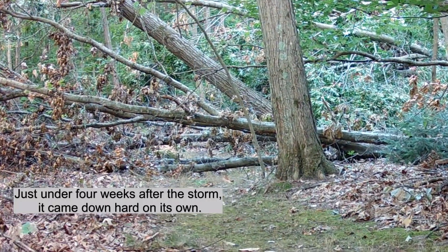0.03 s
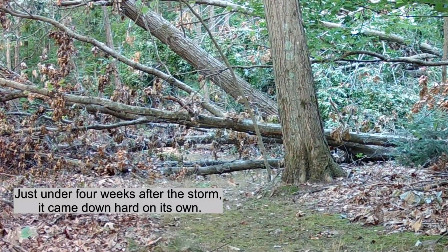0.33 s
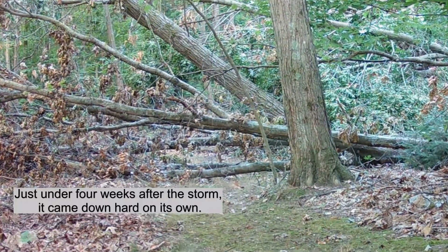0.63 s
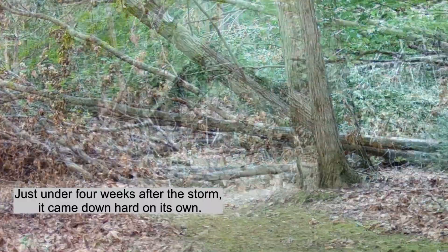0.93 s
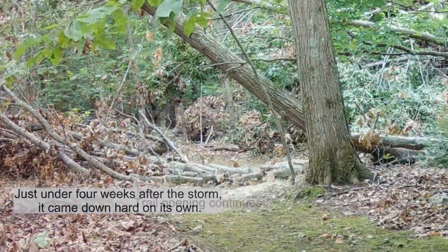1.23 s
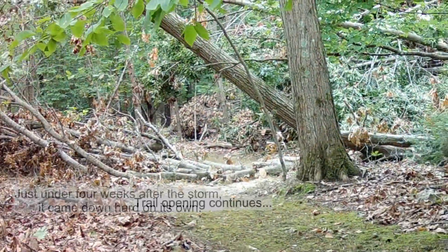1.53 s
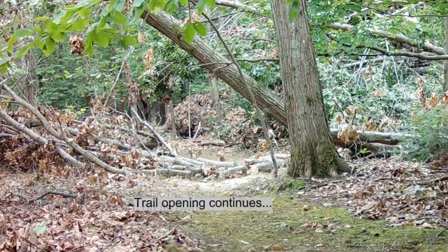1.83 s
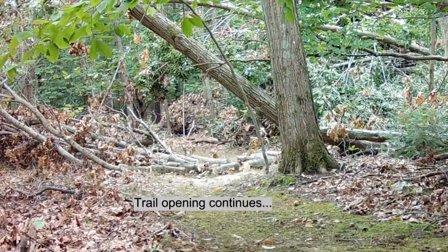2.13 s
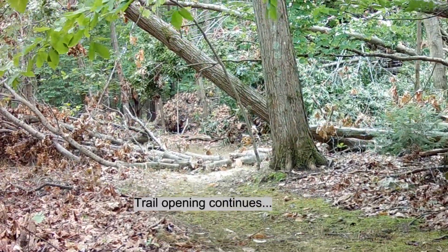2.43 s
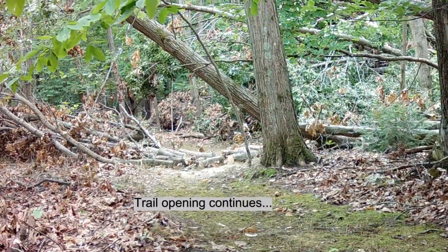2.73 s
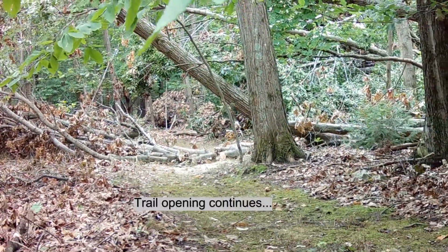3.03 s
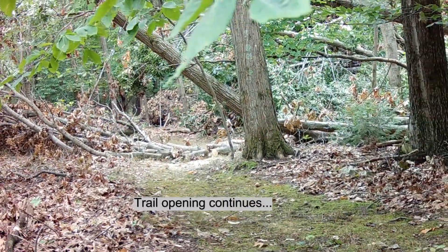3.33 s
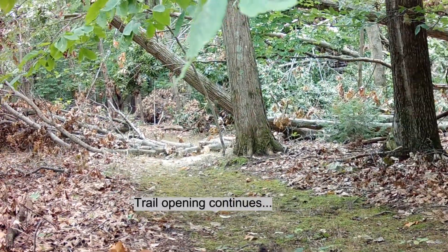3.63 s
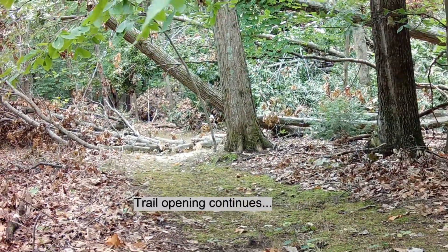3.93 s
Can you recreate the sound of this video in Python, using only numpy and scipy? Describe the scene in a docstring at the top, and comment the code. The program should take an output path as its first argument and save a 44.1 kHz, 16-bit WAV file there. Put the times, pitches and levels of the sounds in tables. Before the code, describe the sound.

Wind in the treetops takes over from a quiet woodland opening, where thin notes, perhaps a distant bird, die away. The leaves keep up an even rustle, with a few close, crisp ticks and uneven wind rumble on the microphone.

```python
"""A few thin high notes die away among the trees, over a quiet wood's far hush and faint microphone hiss.
This gives way, in a straight cross-fade, to the same wood in a steady wind: countless leaves
rustle in the crowns and a few nearer ones tick, while eddies buffet the microphone with rumble
and soft thumps. One microphone, the same in both ears."""
import sys
import numpy as np
from scipy import signal
from scipy.fft import rfft, irfft
from scipy.io import wavfile
from scipy.ndimage import uniform_filter1d

SR = 44100
rng = np.random.default_rng(int(sys.argv[2]) if len(sys.argv) > 2 else 0)


def bounce(signal):
    """Save signal as a 16-bit WAV file at the path given by the first command-line argument."""
    frames = np.transpose(np.atleast_2d(signal))
    limited = np.clip(frames, -1, 1)
    pcm = np.round(limited * 32767).astype(np.int16)
    wavfile.write(sys.argv[1], SR, pcm)


N = 176400
T = np.arange(N) / SR


# Far off among the trees, perhaps a bird. Each row: peak time in seconds, pitch in Hz, echo level in dB.
BIRD_NOTES = [(.012, 3220, -67), (.46, 3730, -81), (.59, 3610, -77)]

def far_bird(rise_s=0.09, t60_s=1.0, waver_hz=6.6, direct_db=-3):
    """Each thin note swells as a wavering tone; the trees smear it into a wider band that trails away."""
    out = 0
    for s, hz, db in BIRD_NOTES:
        rise = np.clip(1 + (T - s) / rise_s, 0, 1)
        decay = np.exp(-np.log(1000) * np.maximum(T - s, 0) / t60_s)
        pitch = hz + waver_hz * drift(per_s=25)
        direct = rms_one(np.sin(2 * np.pi * np.cumsum(pitch) / SR))
        echo = narrow_tone(hz, width_hz=190)
        out += from_db(db) * rise * decay * (from_db(direct_db) * direct + echo)
    return out


# The still wood's far hush, with faint microphone hiss in the high treble.
# Each row: frequency in Hz, relative noise density in dB.
HUSH_AND_HISS_SPECTRUM = [(25, -13), (60, -11), (115, -5), (150, -6.5), (280, -8.5), (450, -7), (850, 0.5),
                          (1300, -3), (2200, -8.5), (3200, -15.5), (5000, -32), (7500, -38.5),
                          (15500, -39.5)]
# Faint steady tones in the quiet. Each row: pitch in Hz, width in Hz, level in dB.
QUIET_TONES = [(90.2, 12, -71.5), (120, 8.5, -72), (617, 11, -74.5), (7770, 260, -95)]

def hush_and_hiss(level_db=-54.5):
    """The still wood's far hush, with faint microphone hiss in the high treble and faint steady tones."""
    return from_db(level_db) * coloured_noise(HUSH_AND_HISS_SPECTRUM) + faint_tones(QUIET_TONES)


# Wind in the crowns, high overhead. Each row: frequency in Hz, relative noise density in dB.
CROWN_SPECTRUM = [(30, -12), (120, -14.5), (250, -12), (370, -7), (500, -7.5), (700, -3.5), (900, -0.5),
                  (1250, 1), (1900, -2), (2500, -1), (3500, -1), (4500, -3.5), (5600, -9.5), (7000, -12.5),
                  (8700, -25), (11300, -37), (12200, -52), (13000, -72)]
# Bands of that rush which flutter separately. Each entry: centre in Hz.
CROWN_BANDS_HZ = [200, 600, 1200, 2000, 3000, 4500, 7000, 11000]
# The wind's slow swell. Each row: time in seconds, tilt towards the low roar in dB, hiss lift in dB.
WIND_SWELL = [(.7, 3, 0), (1.5, -0.1, -0.2), (1.85, -1, -0.1), (2.3, 0.5, 0.25), (2.7, -0.1, -0.1),
              (3.2, 0.8, 0.5), (3.55, -1, -0.6), (3.8, 2.7, 1.5), (4.0, 1, 0)]
# Faint singing overhead. Each row: pitch in Hz, width in Hz, level in dB before the swell.
CROWN_TONES = [(601, 71, -64.5), (810, 30, -59.5), (978.6, 55, -58), (1212, 93, -58.5), (1636, 26, -61),
               (2448, 29, -60)]

def crowns(rush_db=-41.5, sway_db=0.02, flutter_db=0.55, treble_from_hz=1560, treble_full_hz=2600):
    """Far leaves merge into a rush; it swells slowly, each band flutters, and faint tones sing in it."""
    roar_db, hiss_db = in_time(WIND_SWELL)
    sway = sway_db * drift(per_s=3.5)
    rush = 0
    for hz, band in split(coloured_noise(CROWN_SPECTRUM), CROWN_BANDS_HZ):
        treble = np.clip(np.log(hz / treble_from_hz) / np.log(treble_full_hz / treble_from_hz), 0, 1)
        swell = (0.5 - treble) * roar_db + treble * hiss_db
        flutter = flutter_db * drift(per_s=26)
        rush += band * from_db(rush_db + swell + sway + flutter)
    return rush + from_db(roar_db) * faint_tones(CROWN_TONES)


def near_leaves(level_db=-55, ticks_per_s=830, spread_db=2.7, clump_db=3, ring_cycles=6.8, pitches=14):
    """Nearer leaves strike one another in random clumps, each ringing a few cycles at its own pitch."""
    sizes = from_db(spread_db * np.minimum(rng.exponential(1, N), 5)) * rng.choice([-1, 1], N)
    strikes = rng.random(N) < ticks_per_s * from_db(clump_db * drift(per_s=9)) / SR
    pitch_index = rng.integers(0, pitches, N)
    ticks = 0
    for k, hz in enumerate(np.geomspace(1980, 7300, pitches)):
        ticks += resonate(sizes * strikes * (pitch_index == k), hz, 2 * hz / ring_cycles) / hz
    dull = signal.butter(6, 7000, fs=SR, output="sos")
    return from_db(level_db) * rms_one(signal.sosfilt(dull, ticks))


# Gusts right on the microphone. Each row: time in seconds, rumble level in dB before the trim.
MIC_GUSTS = [(.7, -76), (.81, -47.5), (.86, -59.5), (.91, -48.5), (1.01, -44), (1.14, -48.5), (1.2, -62),
             (1.27, -49.5), (1.42, -49), (1.46, -55), (1.52, -46), (1.59, -46), (1.73, -47.5), (1.79, -55),
             (1.86, -49), (2.03, -57.5), (2.24, -47.5), (2.35, -57), (2.48, -57), (2.66, -63),
             (2.83, -46.5), (2.91, -53.5), (3.02, -48.5), (3.1, -57), (3.18, -50), (3.25, -58),
             (3.35, -45.5), (3.46, -52.5), (3.55, -57.5), (3.72, -52), (3.85, -63), (3.92, -49),
             (4.0, -51.5)]
# Faster air makes smaller eddies at its port. Each row: time in seconds, typical eddy pitch in Hz.
PORT_EDDY_PITCH = [(.7, 128), (.9, 140), (1.04, 197), (1.17, 125), (1.33, 116.5), (1.65, 86), (2.2, 80.4),
                   (2.7, 77.5), (3.05, 105), (3.4, 70.6), (4.0, 85.5)]

def rumble(eddies_per_s=210, count=1400, spread_db=2, spread_octaves=0.46, even_s=0.058, trim_db=-0.5):
    """A random stream of eddies hits the microphone; gusts set their strength, air speed their size."""
    gust_db, = in_time(MIC_GUSTS)
    times = MIC_GUSTS[0][0] + np.cumsum(rng.uniform(0, 2, count)) / eddies_per_s
    heights = rng.choice([-1, 1], count) * from_db(spread_db * rng.standard_normal(count))
    typical_hz = np.interp(times, *np.transpose(PORT_EDDY_PITCH))
    hz = typical_hz * 2 ** (spread_octaves * rng.standard_normal(count))
    stream = eddies(np.column_stack([times, heights, hz])[times < T[-1]])
    port_low_cut = signal.butter(2, 20, "high", fs=SR, output="sos")
    stream = signal.sosfilt(port_low_cut, stream + 1e-18)
    # Even out the stream so that the gusts shape its level.
    power = uniform_filter1d(stream ** 2, int(even_s * SR)) + 1e-3
    return from_db(trim_db + gust_db) * stream / np.sqrt(power)


def eddies(rows, half_length_cycles=0.28):
    """Each eddy (seconds, height, Hz) passes the port as one smooth push and pull of pressure."""
    t, out = np.arange(-SR // 20, SR // 20) / SR, np.zeros(N)
    for s, height, hz in rows:
        puff = -np.sin(2 * np.pi * hz * t) * np.exp(-(hz * t / half_length_cycles) ** 2 / 2)
        add(out, s + t[0], height * puff / puff.max())
    return out


# Direct hits on the microphone port. Each row: time in seconds, peak level in dB, pitch in Hz.
PORT_THUMPS = [(0.801, -41.5, 180), (0.912, -38.5, 128), (.926, -41, 130), (.959, -38.5, 255),
               (.971, -36.5, 205), (.998, -38.5, 110), (1.012, -32.5, 222), (1.021, -41, 140),
               (1.046, -37, 150), (1.053, -36, 320), (1.074, -35.5, 245), (1.107, -42, 150),
               (1.127, -40, 150), (1.140, -37, 165), (1.268, -37, 150), (1.330, -37.5, 185),
               (1.411, -39, 100), (1.485, -38.5, 130), (1.510, -30, 145), (1.526, -33, 95),
               (1.539, -32.5, 135), (1.957, -35.5, 114), (2.148, -42.5, 107), (2.232, -42.5, 154),
               (2.864, -40, 107), (2.982, -37, 125), (3.055, -35, 145), (3.176, -43, 152), (3.443, -38, 99),
               (3.470, -33.5, 138)]

def thumps():
    """The strongest eddies stand out as soft thumps."""
    return eddies([(s, from_db(db), hz) for s, db, hz in PORT_THUMPS])


# Dry leaves close to the microphone. Each row: start in seconds, peak level in dB, pitch in Hz.
LEAF_SNAPS = [(1.594, -52, 7500), (1.778, -55, 7500), (1.829, -42, 6500), (2.016, -52, 7500)]

def leaf_snaps(decay_s=0.0024, width_hz=3200):
    """A dry leaf close by gives a very short, crisp crack."""
    t, out = T[:SR // 20], np.zeros(N)
    soften = signal.butter(8, 11000, fs=SR, output="sos")
    for s, db, hz in LEAF_SNAPS:
        burst = rng.standard_normal(len(t)) * np.exp(-t / decay_s)
        ring = resonate(resonate(burst, hz, width_hz), hz, width_hz)
        crack = signal.sosfilt(soften, ring)
        add(out, s, from_db(db) * crack / np.abs(crack).max())
    return out


def from_db(db):
    """Decibels to gain."""
    return 10 ** (np.asarray(db) / 20)


def rms_one(x):
    """Scale to unit power."""
    return x / np.sqrt(np.mean(x ** 2) + 1e-20)


def in_time(rows):
    """Each column of a timed curve at every sample."""
    s, *columns = np.transpose(rows)
    return [np.interp(T, s, column) for column in columns]


def drift(per_s):
    """A smooth random wander with a spread of about 1."""
    hop, settle = 40, 2000
    r = np.exp(-2 * np.pi * per_s * hop / SR)
    noise = rng.standard_normal(N // hop + settle + 2)
    slow = signal.lfilter([1], [1, -2 * r, r * r], noise)[settle:]
    return np.interp(np.arange(N) / hop, np.arange(len(slow)), rms_one(slow))


def resonate(x, hz, width_hz):
    """One resonance with gain 1 at its peak."""
    r = np.exp(-np.pi * width_hz / SR)
    feedback = [1, -2 * r * np.cos(2 * np.pi * hz / SR), r * r]
    return signal.lfilter(np.array([1, 0, -1]) * (1 - r * r) / 2, feedback, x + 1e-18)


def narrow_tone(hz, width_hz):
    """Noise twice through one resonance; unit power."""
    noise = rng.standard_normal(N + SR // 2)
    return rms_one(resonate(resonate(noise, hz, width_hz), hz, width_hz)[-N:])


def faint_tones(rows):
    """Several narrow tones sounding together."""
    return sum(from_db(db) * narrow_tone(hz, width_hz) for hz, width_hz, db in rows)


def coloured_noise(spectrum):
    """Noise that follows a spectrum; unit power."""
    hz, db = np.transpose(spectrum)
    log_hz = np.log(np.fft.rfftfreq(N, 1 / SR) + 1)
    gain = from_db(np.interp(log_hz, np.log(hz), db))
    return rms_one(irfft(rfft(rng.standard_normal(N)) * gain, N))


def split(x, centres_hz):
    """Overlapping bands (centre in Hz, sound) that add up to the whole."""
    log_hz, bins = np.log(np.fft.rfftfreq(N, 1 / SR) + 1), rfft(x)
    for hz, share in zip(centres_hz, np.eye(len(centres_hz))):
        yield hz, irfft(bins * np.interp(log_hz, np.log(centres_hz), share), N)


def add(out, start_s, sound):
    """Mix a short sound in at its time."""
    i = int(np.clip(start_s * SR, 0, N))
    out[i:i + len(sound)] += sound[:N - i]


def scene(fade_start_s=0.71, fade_end_s=1.56, first_share=0.16):
    """The quiet wood fades out as the windy wood fades in; the microphone is buffeted from then on."""
    wind_share = np.interp(T, [fade_start_s, fade_end_s], [first_share, 1], left=0)
    quiet = hush_and_hiss() + far_bird()
    windy = crowns() + near_leaves() + leaf_snaps()
    mono = (1 - wind_share) * quiet + wind_share * windy + rumble() + thumps()
    return np.array([mono, mono])


def record(dry):
    """The treble is cut steeply above 15.7 kHz."""
    return signal.sosfilt(signal.ellip(10, .1, 70, 15700, fs=SR, output="sos"), dry)


dry = scene()
out = record(dry)
bounce(out)
```